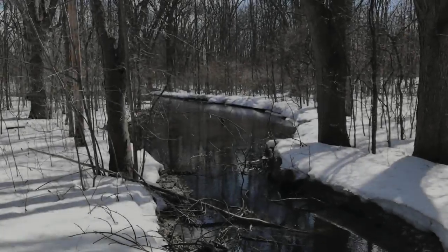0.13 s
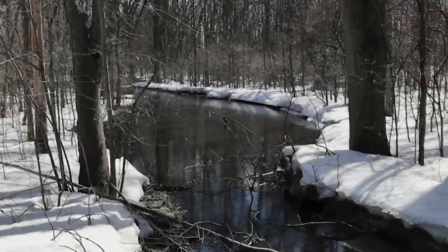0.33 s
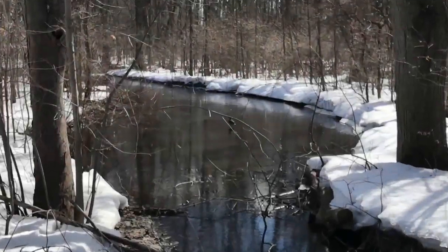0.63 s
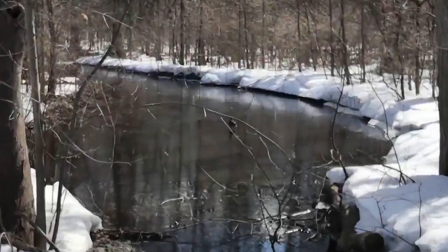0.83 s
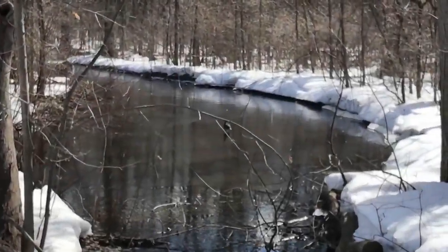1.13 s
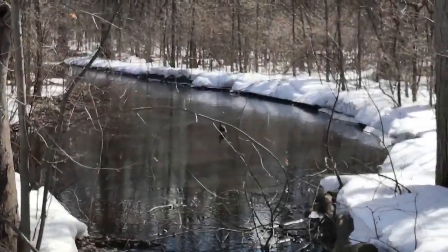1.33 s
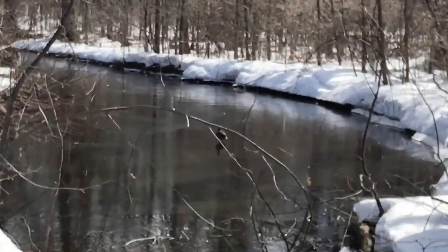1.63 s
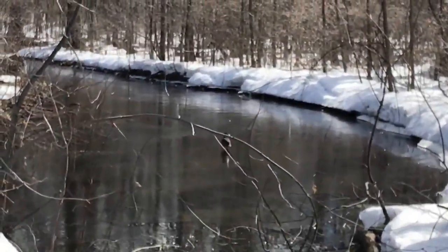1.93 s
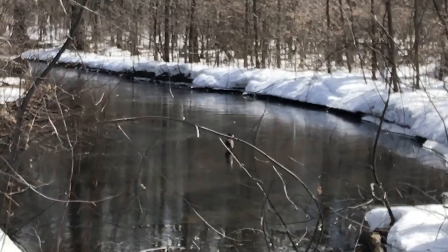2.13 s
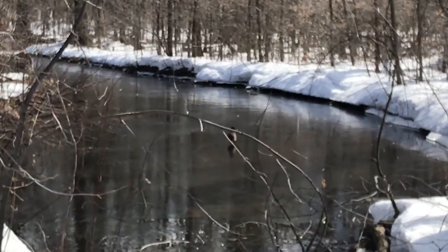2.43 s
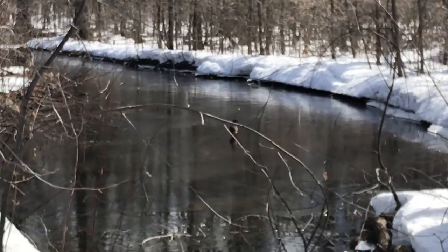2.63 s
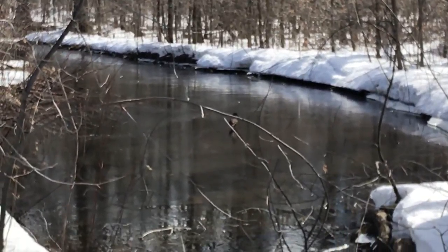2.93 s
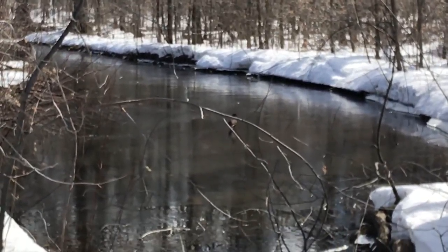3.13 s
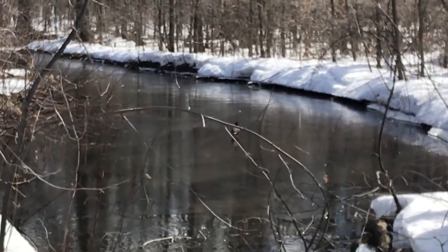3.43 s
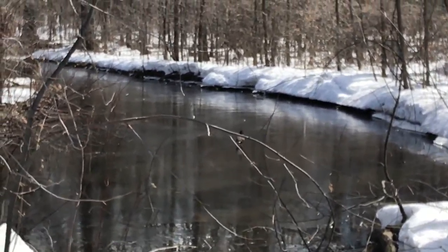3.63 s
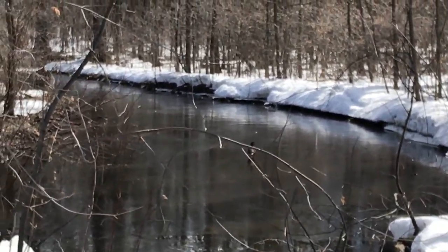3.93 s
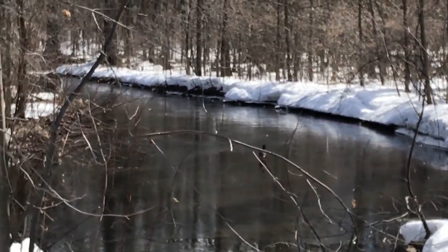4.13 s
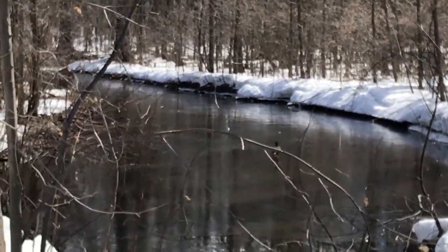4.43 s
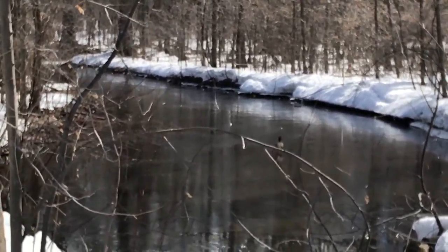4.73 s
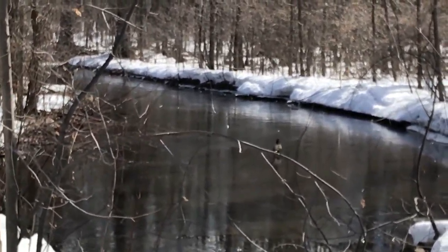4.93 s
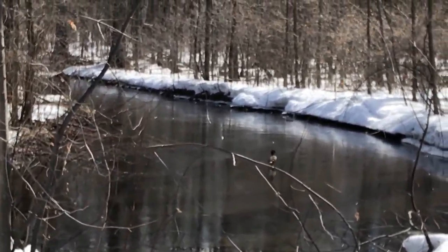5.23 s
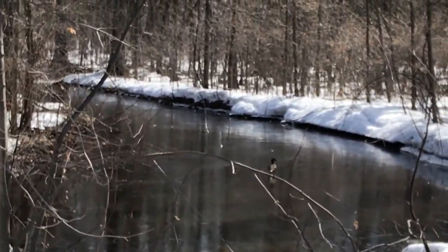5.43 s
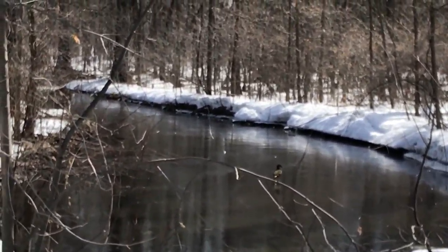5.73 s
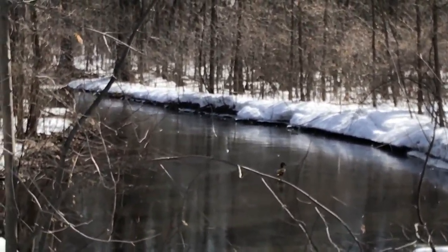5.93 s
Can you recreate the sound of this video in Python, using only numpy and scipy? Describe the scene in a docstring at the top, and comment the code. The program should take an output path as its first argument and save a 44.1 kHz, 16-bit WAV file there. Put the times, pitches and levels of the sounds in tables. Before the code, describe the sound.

Beside a slow creek in the woods, a duck repeats a short, hoarse quack at an even pace, growing louder over the first three calls and then holding. A far crow gives four faint caws near the start. Low wind rumble and brief thumps hit the microphone, strongest a little before the middle. Twigs tick lightly now and then over a very soft wash of water.

```python
"""Duck by a winter creek

A duck quacks eleven times in snowy woods, each quack a train of snaps ringing its throat and bill.
A far crow caws four times, and the trunks scatter both birds back as a thin echo.
Wind rumbles and thumps on the microphone, twigs tick, and the slow creek makes a faint wash."""
import sys
import numpy as np
from scipy import signal
from scipy.fft import rfft, irfft
from scipy.io import wavfile
from scipy.ndimage import uniform_filter1d

SR = 44100
rng = np.random.default_rng(int(sys.argv[2]) if len(sys.argv) > 2 else 0)


def wrap_up_sound(samples):
    """Save the sound to the file named by the first command line argument, as 16-bit audio."""
    columns = np.atleast_2d(samples).T
    # keep every value between -1 and 1, then stretch to whole-number steps
    tamed = np.clip(columns, -1, 1)
    steps = np.round(tamed * 32767).astype(np.int16)
    wavfile.write(sys.argv[1], SR, steps)


N = 268348

# buffets of wind on the microphone: (time [s], level [dB], length [s], upper corner [Hz])
BUFFETS = [(.005, -42.5, 0.039, 103.5), (0.151, -51, 0.034, 90), (0.283, -45, .012, 222),
           (0.309, -45, 0.054, 95), (.451, -34, 0.021, 323), (0.804, -31, 0.022, 280),
           (1.004, -38.5, 0.021, 160), (1.31, -45, 0.017, 96), (1.485, -43.5, 0.028, 196),
           (2.026, -40, 0.025, 100), (2.077, -41, 0.028, 170), (2.378, -36, 0.021, 315),
           (2.401, -25.5, 0.022, 102), (2.453, -29, .014, 133), (3.407, -37.5, 0.021, 170),
           (3.925, -52, 0.015, 90), (4.251, -47, 0.1, 116), (4.518, -46, .025, 90),
           (4.815, -41, 0.025, 85.5), (4.905, -38, 0.02, 90), (5.102, -35, 0.02, 166),
           (5.649, -42, 0.028, 174), (5.947, -33.5, 0.033, 122), (5.983, -28, 0.014, 97)]
RELEASE = 0.02  # closing share of a quack, where effort and pitch drop


def quack(start, end, first_db, last_db, top_hz, climb, offbeat, opening, *lifts_db,
          waver=.006, jitter=.008, shimmer_db=1.3, mouth_db=6.5, mouth_width_hz=300,
          shut_db=-12, parting_s=.075, air=.045, size=10240):
    """The syrinx snaps once a cycle; a duller off-beat pulse in between brings out the octave."""
    t, hz = np.arange(size) / SR, np.fft.rfftfreq(size, 1 / SR)
    length = end - start
    drift = 1 + waver * flutter(size)
    cycles = np.cumsum(top_hz * drift * quack_pitch(t / length, climb)) / SR
    count = np.arange(68)
    weak = count % 2  # off-beat pulses land just past mid-cycle
    slip, wobble, scatter = rng.uniform(-1.0, 1, (3, len(count)))
    at = np.interp(count // 2 + .51 * weak + jitter * (1 + 3 * weak) * slip, cycles, t)
    effort_db, sharp_db, offbeat_gain, dull_db, mouth_hz = quack_gesture(at / length)
    force = amp(effort_db + (last_db - first_db) * at / length + shimmer_db * wobble)
    force *= np.where(weak, offbeat * offbeat_gain, 1)
    force *= np.clip(np.minimum(at, length - at) / 0.0026, 0, 1)
    # sharper closures put more into the band above the low throat resonances
    upper = 1 / (1 + (1500 / (hz + 1)) ** 6)
    colour_db = (dull_db * weak + shimmer_db * scatter)[:, None] * upper
    colour_db += sharp_db[:, None] * upper / (1 + (hz / 3000) ** 4)
    # as the bill parts, treble escapes and the mouth resonance climbs
    colour_db += shut_db * np.clip(1 - at / parting_s, 0, 1)[:, None] / (1 + (2800 / (hz + 1)) ** 6)
    colour_db += mouth_db / (1 + ((hz - opening * mouth_hz[:, None]) / mouth_width_hz) ** 2)
    delays = np.exp(-2j * np.pi * at[:, None] * hz)
    pulses = irfft((force[:, None] * amp(colour_db) * delays).sum(0))
    # each pulse lets out a puff of turbulent air, mostly treble
    puff_power = signal.lfilter([1], [1, -np.exp(-1 / (0.0013 * SR))], pulses ** 2)
    puffs = np.sqrt(puff_power) * rng.standard_normal(size)
    drive = rfft(unit(pulses)) + air * (1 + hz / 800) * rfft(unit(puffs))
    voice = irfft(drive * throat_and_bill(hz, lifts_db))
    return amp((first_db + last_db) / 2) * unit(voice) * np.sqrt(length * SR / size)


def quack_pitch(u, climb, first=.71, plateau=.84, curve=1.9, sag=0.079):
    """Pitch as a share of its top, at share u of the quack: it climbs, levels off and finally sags."""
    u = np.clip(u, 0, 1)
    below = (1 - first) * np.maximum(1 - u ** (1 / climb) / plateau, 0) ** curve
    return 1 - below - sag * np.maximum(1 - (1 - u) / RELEASE, 0)


def quack_gesture(u, attack=0.17, attack_db=-17, swell_db=4, release_db=-4,
                  soft_db=-12, rasp_db=5.5, shut_hz=680, open_hz=2074):
    """Effort and tone at share u of the quack: a soft start, a hard rasp, then an open bill."""
    u = np.clip(u, 0, 1)
    shut = np.exp(-(u / 0.15) ** 1.73)
    rasp = np.exp(-((u - 0.33) / 0.13) ** 2)  # the snaps are hardest a third of the way in
    effort_db = attack_db * np.maximum(1 - u / attack, 0) + swell_db * (u - .5)
    effort_db += release_db * np.maximum(1 - (1 - u) / RELEASE, 0)
    sharp_db = soft_db * shut - 0.1 * (1 - shut) + rasp_db * rasp
    offbeat_gain = 0.85 - 0.19 * u
    offbeat_dull_db = -3.5 - 6.5 * rasp
    mouth_hz = open_hz + (shut_hz - open_hz) * shut
    return effort_db, sharp_db, offbeat_gain, offbeat_dull_db, mouth_hz


def throat_and_bill(hz, lifts_db, smear_s=.002):
    """The resonances that colour a quack; the low ones swell a moment after each snap."""
    # throat response: (frequency [Hz], gain [dB])
    throat = [(150, -19.5), (340, -8.5), (510, -7.5), (700, -1), (870, -6), (1050, -1.5), (1220, -13.5),
              (1400, -0.5), (1610, -7.5), (1890, 1.5), (2200, -6.5), (2520, -4.5), (2950, -24),
              (4200, -34.5), (7500, -37.5), (15500, -49.5)]
    # three bill resonances: (centre [Hz], width [Hz], gain [dB])
    bill_modes = [(3370, 460, -17.5), (6040, 1300, -27.5), (8930, 1470, -29.5)]
    bill = sum(amp(db + lift) / (1 + (2 * (hz - centre) / width) ** 4)
               for (centre, width, db), lift in zip(bill_modes, lifts_db))
    tract_db = 20 * np.log10(amp(read(throat, hz)) + bill)
    delay_s = smear_s / (1 + (hz / 1450) ** 8)
    return np.exp(-2j * np.pi * np.cumsum(delay_s) * hz[1]) * causal(tract_db)


def caw(start, end, db, top_hz, arch=.24, overtone_db=-25, dip_db=-9, dip_width=0.16):
    """A hoarse arch of pitch that falters at its top; distance leaves little but one rasping partial."""
    u = np.linspace(-1, 1, round((end - start) * SR))
    waver, swell, rasp = (flutter(SR, smooth=220)[:len(u)] for _ in range(3))
    pitch_hz = top_hz * (1 - arch * u ** 2) * (1 + 0.028 * waver)
    phase = 2 * np.pi * np.cumsum(pitch_hz) / SR
    tone = (1 + swell) * np.sin(phase) + rasp * np.cos(phase) + amp(overtone_db) * np.sin(2 * phase)
    falter_db = dip_db * np.exp(-(u / dip_width) ** 2)
    return amp(db + falter_db) * unit(tone * signal.windows.tukey(len(u), .25))


def trees(x, gap_s=0.0037, build_s=0.0062, taps_per_s=1500):
    """Trunks scatter the sound back as sparse taps; the treble dies first."""
    # echo colour: (frequency [Hz], gain [dB])
    colour = [(300, -8), (700, -17.5), (1300, -10.5), (2000, -14), (3300, -5), (4500, 2.5), (6000, 0),
              (7500, -1.5), (9000, -16), (14000, 4)]
    # echo tail: (frequency [Hz], time to fall 60 dB [s])
    tail = [(300, 1.6), (1000, 1.43), (2000, 1.04), (3300, 0.53), (6000, 0.77), (12000, 0.69)]
    t = np.arange(SR) / SR
    taps = rng.standard_normal(SR) * (rng.random(SR) < taps_per_s / SR)
    taps *= np.clip((t - gap_s) / build_s, 0, 1)
    hz, when, bands = signal.stft(unit(taps), SR, nperseg=256)
    t60 = read(tail, hz)[:, None]
    decay = amp(read(colour, hz)[:, None] - 60 * when / t60)
    decay *= np.sqrt(np.log(1e6) / (t60 * SR))  # a longer tail adds no energy
    response = signal.istft(bands * decay, SR, nperseg=256)[1]
    return signal.fftconvolve(x, response)[:N]


def wind(rumble_db=0.5, lumps_db=3, wake_db=-5, lead_s=0.019, wake_s=0.031):
    """Eddies rumble on the microphone, following the breeze in lumps and swelling around each buffet."""
    # rumble spectrum: (frequency [Hz], level [dB])
    rumble = [(20, -44), (31, -16), (45, 0.5), (60, 4.5), (85, -5.5), (125, -9.5), (180, -21), (260, -27),
              (400, -52), (800, -56), (2000, -74)]
    # strength of the breeze: (time [s], level [dB])
    breeze = [(0, -52.5), (.4, -49), (.66, -59.5), (1.4, -56), (1.97, -59.5), (2.12, -47), (2.36, -47),
              (2.72, -65.5), (3.25, -55), (3.65, -71), (4.05, -54), (4.36, -45), (4.66, -56), (5.0, -48.5),
              (5.55, -56), (6.08, -46.5)]
    t = np.arange(N) / SR
    eddies = noise(rumble)
    eddies /= np.sqrt(uniform_filter1d(eddies ** 2, size=2200) + 1e-6)  # even out the level
    lump_band = signal.butter(2, [5, 14], "band", fs=SR, output="sos")
    lumps = unit(signal.sosfilt(lump_band, rng.standard_normal(N)))
    power = amp(np.interp(t, *np.transpose(breeze)) + lumps_db * lumps) ** 2
    for start, db, length, _ in BUFFETS:
        before = np.maximum(start + length / 2 - t, 0)
        after = np.maximum(t - start - length, 0)
        power += (amp(db + wake_db) * np.exp(-before / lead_s - after / wake_s)) ** 2
    return amp(rumble_db) * np.sqrt(power) * eddies


def buffet(db, length, corner_hz, low_hz=55, rise_s=0.004, fall_s=0.0057, size=8192):
    """Wind thumps the microphone: a short burst of deep turbulence."""
    t = np.arange(size) / SR
    envelope = np.minimum(t / rise_s, 1) * np.exp(-np.maximum(t - length, 0) / fall_s)
    push = rng.standard_normal(size) * envelope
    burst = signal.sosfilt(signal.butter(4, corner_hz, fs=SR, output="sos"), push)
    burst = signal.sosfilt(signal.butter(3, low_hz, "high", fs=SR, output="sos"), burst)
    return amp(db) * unit(burst) * np.sqrt(length * SR / size)


def twig(db, decay_s, centre_hz, spread=1.56, size=4096):
    """A twig or the snow crust cracks: a dry tick of bright noise."""
    band = signal.butter(2, [centre_hz / spread, centre_hz * spread], "band", fs=SR, output="sos")
    crack = unit(signal.sosfilt(band, rng.standard_normal(size)))
    return amp(db) * crack * np.exp(-np.arange(size) / SR / decay_s)


def creek(ripple_db=1.38):
    """Slow water makes a faint wash that ripples slightly in level."""
    # spectrum of the creek and woods: (frequency [Hz], level [dB])
    wash = [(20, -23), (60, 8), (150, 2), (300, -4), (500, -8), (900, -11.5), (1400, -15), (2000, -16.5),
            (2800, -23), (4000, -27), (6500, -30.5), (9500, -29), (10400, -33.5), (11500, -30),
            (15500, -31.5)]
    # slow swell of the wash: (time [s], level [dB])
    swell = [(0, -64), (.35, -66), (.5, -62), (.9, -60.5), (1.3, -60), (2, -57.5), (3.3, -58), (4.5, -57),
             (6.08, -57)]
    level_db = np.interp(np.arange(N) / SR, *np.transpose(swell)) + ripple_db * flutter(N)
    return noise(wash) * amp(level_db)


def amp(db):
    """Decibels to gain."""
    return 10 ** (np.asarray(db) / 20)


def unit(x):
    """Scales to rms 1."""
    return x / np.sqrt(np.mean(x ** 2) + 1e-20)


def flutter(size, smooth=900):
    """A random waver of rms 1, averaged over `smooth` samples."""
    return unit(uniform_filter1d(rng.standard_normal(size), size=smooth))


def read(points, hz):
    """Reads a table on a log-frequency axis."""
    f, value = np.transpose(points)
    return np.interp(np.log(hz + 1), np.log(f), value)


def noise(points):
    """Noise of rms 1 with the given spectrum."""
    gain = amp(read(points, np.fft.rfftfreq(N, 1 / SR)))
    return unit(irfft(rfft(rng.standard_normal(N)) * gain, N))


def causal(db):
    """The response with this gain that rings only after it is struck."""
    log_gain = np.log(amp(np.r_[db, db[-2:0:-1]]))
    return np.exp(np.conj(signal.hilbert(log_gain)))[:len(db)]


def add(mix, start, sound):
    """Mixes a sound in at `start` seconds."""
    part = mix[max(round(start * SR), 0):][:len(sound)]
    part += sound[:len(part)]


def scene(crow_echo_db=6):
    """Duck and crow among the trees, wind and twigs close by, the creek underneath."""
    # duck calls: (start [s], end [s], first level [dB], last level [dB], top pitch [Hz],
    # climb speed [factor], off-beat strength [0-1], mouth resonance [factor],
    # lift of the low, middle and high bill resonance [dB each])
    quacks = [ (0.02, 0.182, -54, -53, 168.4, 1.23, 1, 0.92, -8, -8, -0.5),
              (0.586, 0.759, -50, -48, 177, 1.08, 1, 0.88, -11, -4.5, 0),
              (1.173, 1.350, -43.5, -46.5, 170.7, 1.04, 0.91, 1, -10, 0.5, -5),
              (1.756, 1.937, -42.5, -44, 176, 1.02, 0.96, 1.03, -26, -2, -1.5),
              (2.346, 2.515, -42, -45, 177.8, 0.87, 1, 1.02, -1, 0.5, 0.5),
              (2.921, 3.094, -40.5, -43.5, 173.1, 1.19, 0.87, 1.03, 2.5, 3, 9.5),
              (3.521, 3.695, -42, -44.5, 174.8, 1.01, 0.99, 1.05, -3.5, 0.5, 0),
              (4.116, 4.282, -42, -45, 179.6, 1.04, 1, 1.06, -10, 2.5, -3),
              (4.705, 4.884, -42, -44.5, 180.7, 1.03, 1, 1.04, -9, 1.5, -12),
              (5.312, 5.491, -43, -44.5, 177, 1.09, 0.9, 1.03, -2, 0, -7),
              (5.91, 6.085, -40.5, -44, 175.5, 1.13, 0.93, 1.06, -0.5, -5, -14)]
    # crow calls: (start [s], end [s], level [dB], top of the main partial [Hz])
    caws = [(0.917, 1.051, -62.5, 1413), (1.292, 1.392, -58, 1445), (1.636, 1.756, -60, 1460),
            (1.973, 2.077, -59, 1446)]
    # cracks of twigs and crusted snow: (time [s], level [dB], decay [s], centre [Hz])
    cracks = [(.144, -66, .002, 5000), (0.185, -52.5, 0.0048, 3900), (.51, -67.5, .015, 4280),
              (.662, -63, 0.006, 6140), (.783, -64, .006, 3800), (.946, -67, .003, 7000),
              (0.957, -67.5, 0.0091, 6000), (1.089, -65, .002, 7360), (1.471, -51.5, 0.0013, 4280),
              (1.5824, -67, .002, 10000), (2.2838, -63, 0.0024, 7000), (2.866, -61, 0.0017, 6050),
              (3.2023, -64, 0.0018, 6500), (3.69, -59, .003, 11000)]
    duck, crow, near = np.zeros((3, N))
    for row in quacks:
        add(duck, row[0], quack(*row))
    for row in caws:
        add(crow, row[0], caw(*row))
    for start, *row in BUFFETS:
        add(near, start, buffet(*row))
    for start, *row in cracks:
        add(near, start, twig(*row))
    birds = duck + crow + trees(duck + amp(crow_echo_db) * crow)
    return (birds + near + wind() + creek())[None]


def record(dry, low_cut_hz=32, edge_hz=15720):
    """The microphone's low cut and the recorder's band limit."""
    hz = np.fft.rfftfreq(2 * N, 1 / SR)
    cut = irfft(rfft(dry, 2 * N) / np.sqrt(1 + (low_cut_hz / (hz + 1)) ** 6))[:, :N]
    lowpass = signal.firwin(511, edge_hz, window=("kaiser", 9), fs=SR)
    return signal.oaconvolve(cut, lowpass[None], "same")


dry = scene()
out = record(dry)
wrap_up_sound(out)
```